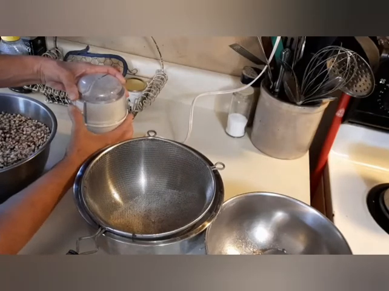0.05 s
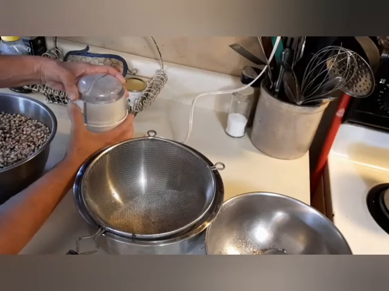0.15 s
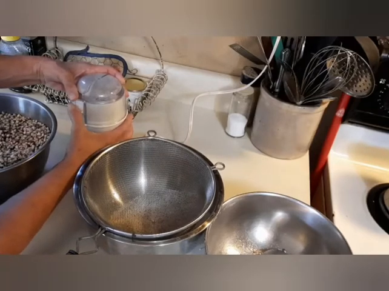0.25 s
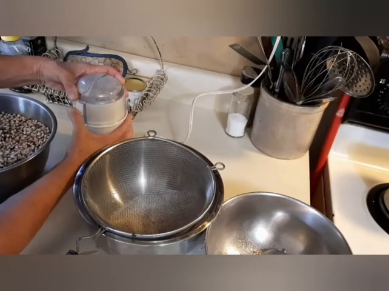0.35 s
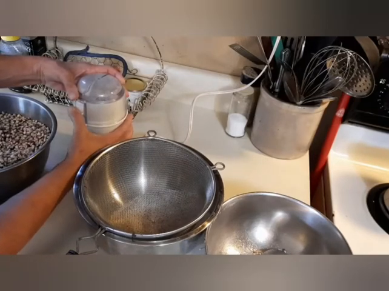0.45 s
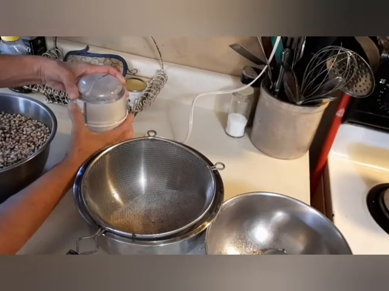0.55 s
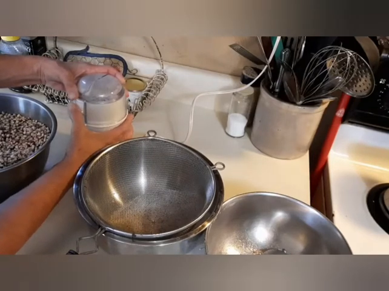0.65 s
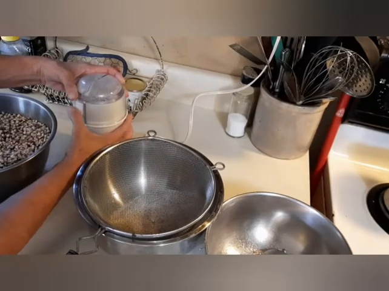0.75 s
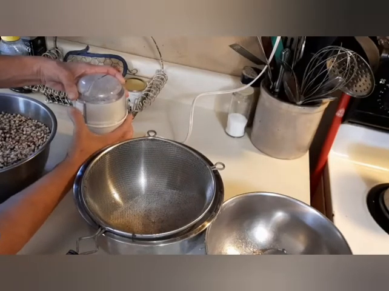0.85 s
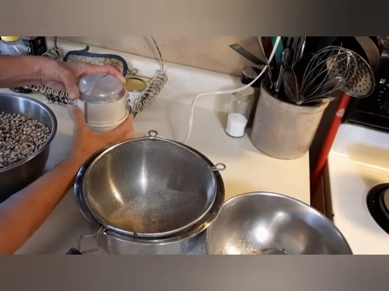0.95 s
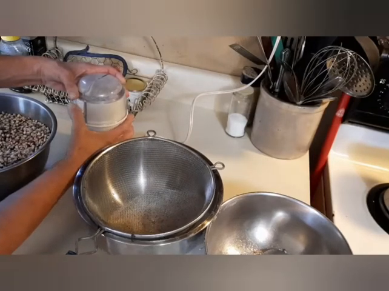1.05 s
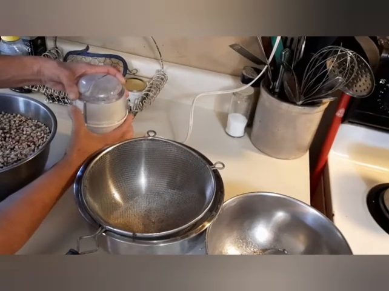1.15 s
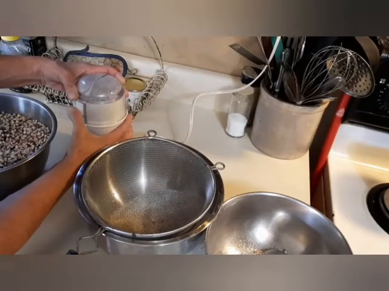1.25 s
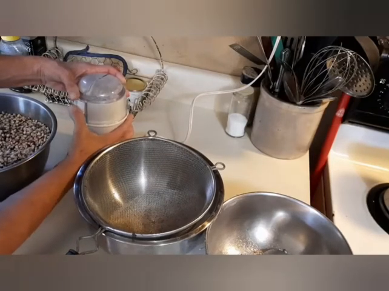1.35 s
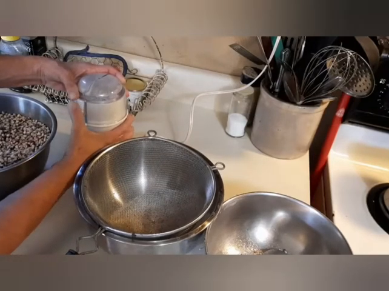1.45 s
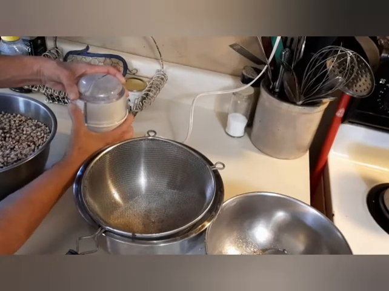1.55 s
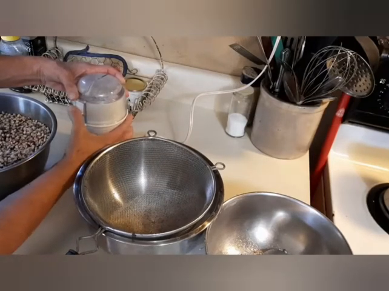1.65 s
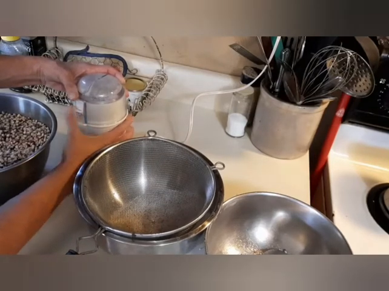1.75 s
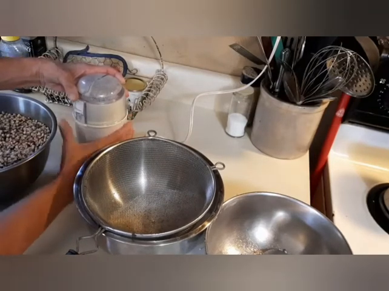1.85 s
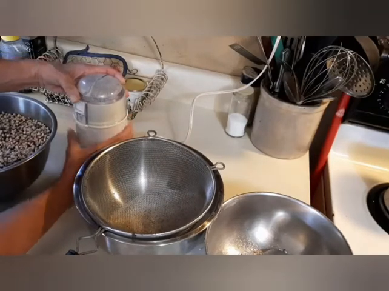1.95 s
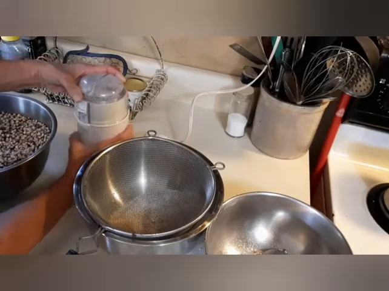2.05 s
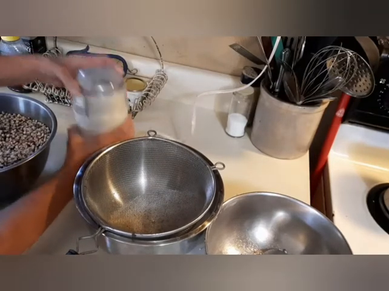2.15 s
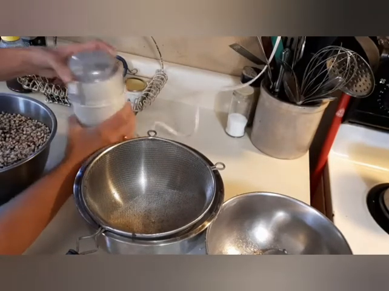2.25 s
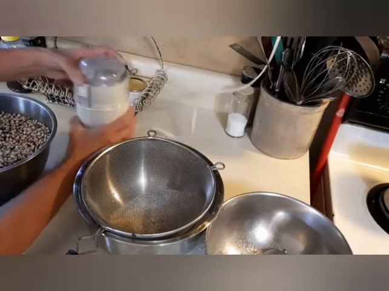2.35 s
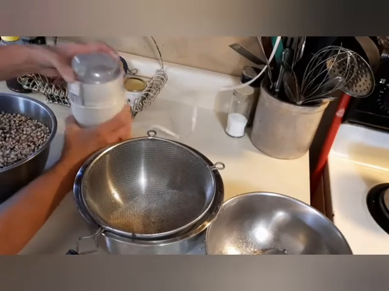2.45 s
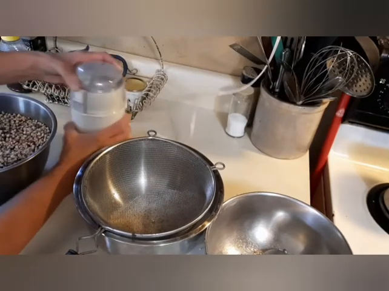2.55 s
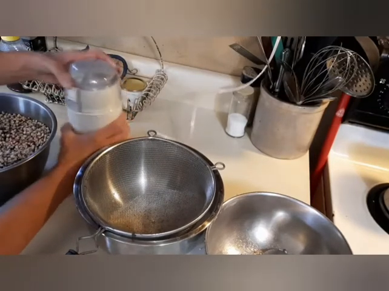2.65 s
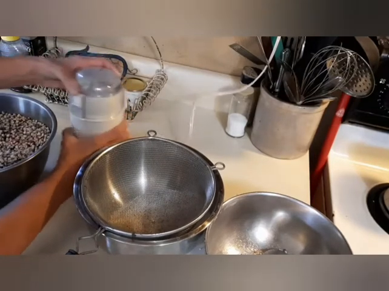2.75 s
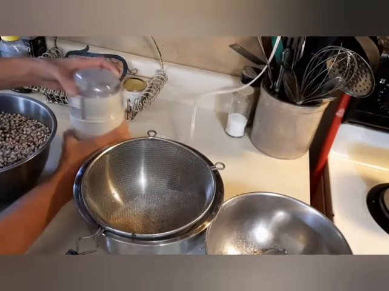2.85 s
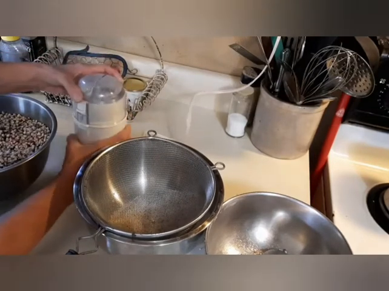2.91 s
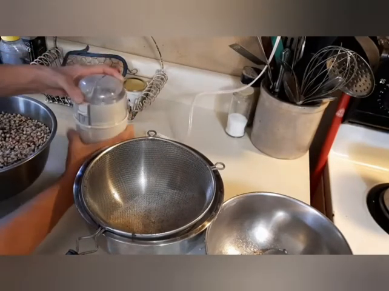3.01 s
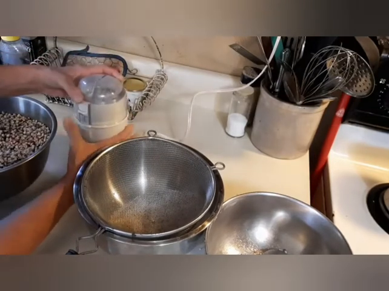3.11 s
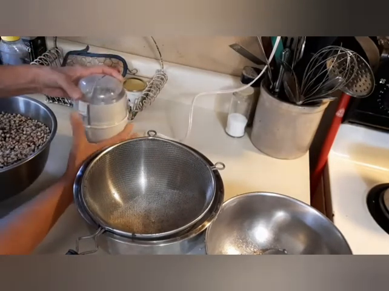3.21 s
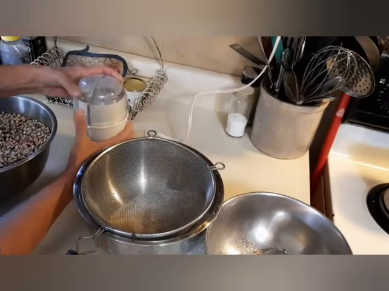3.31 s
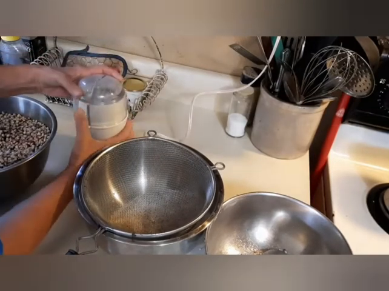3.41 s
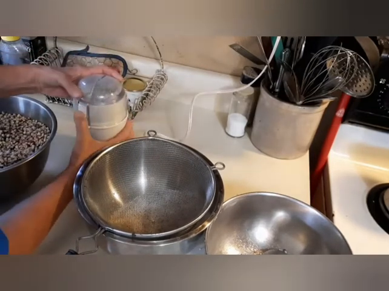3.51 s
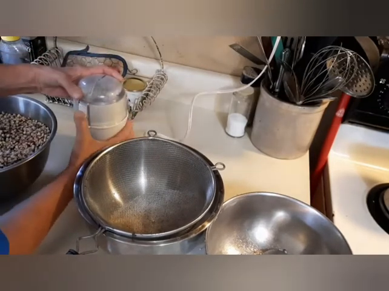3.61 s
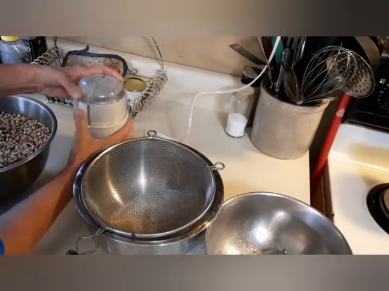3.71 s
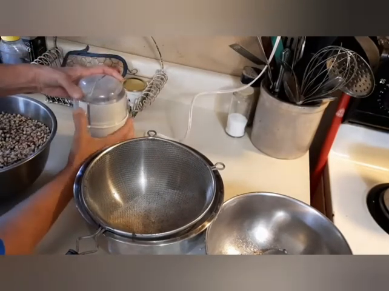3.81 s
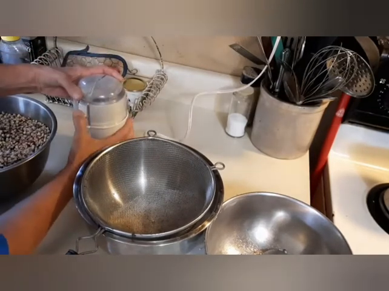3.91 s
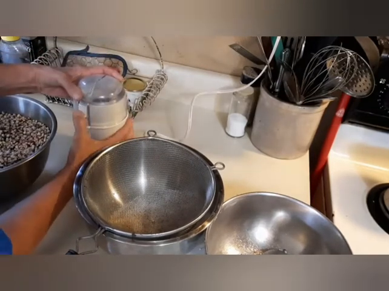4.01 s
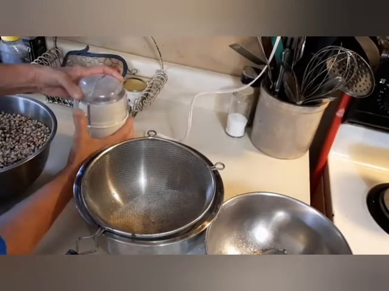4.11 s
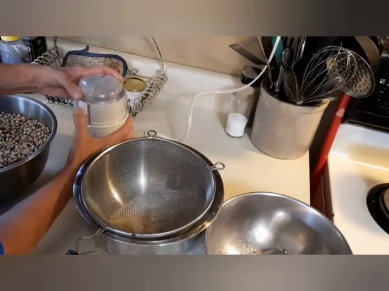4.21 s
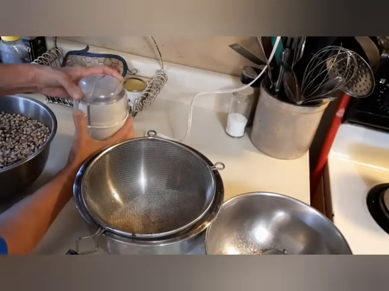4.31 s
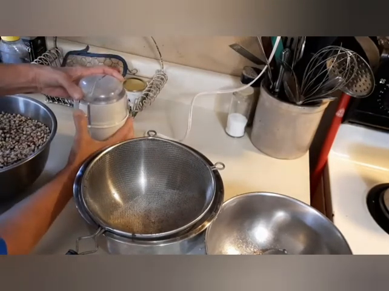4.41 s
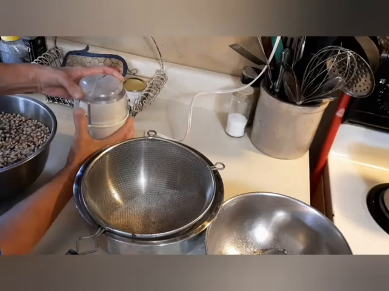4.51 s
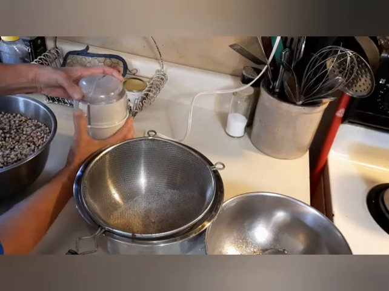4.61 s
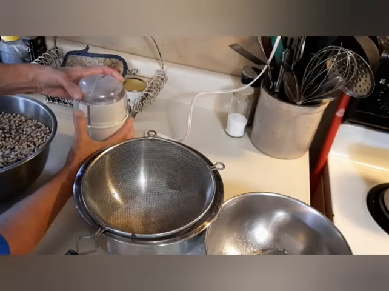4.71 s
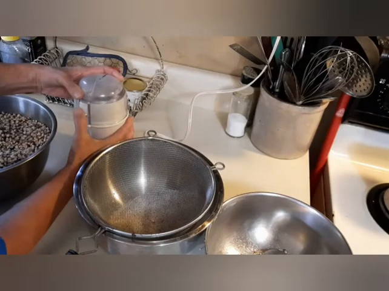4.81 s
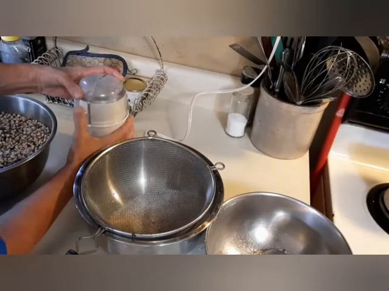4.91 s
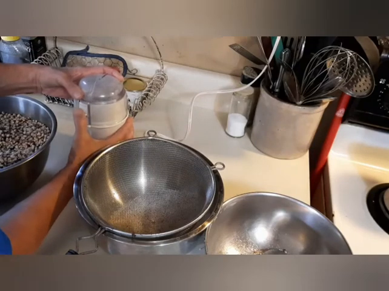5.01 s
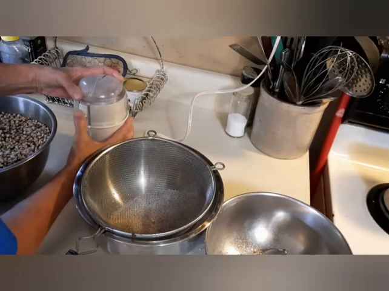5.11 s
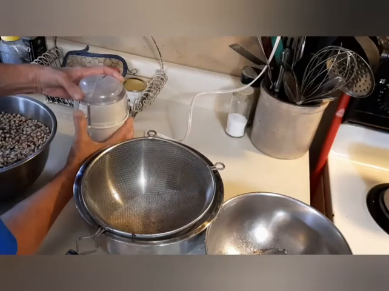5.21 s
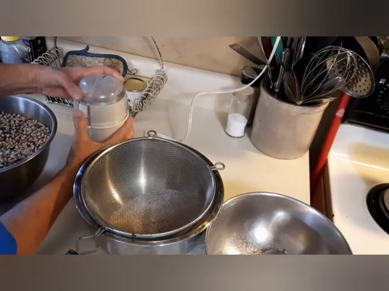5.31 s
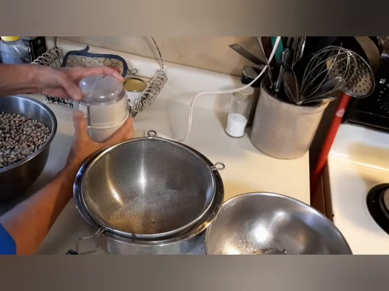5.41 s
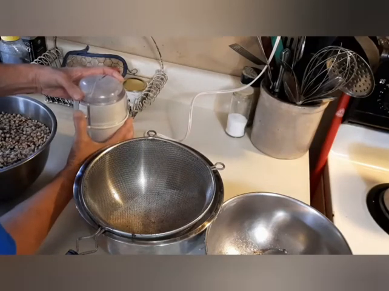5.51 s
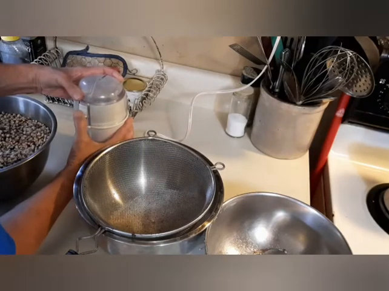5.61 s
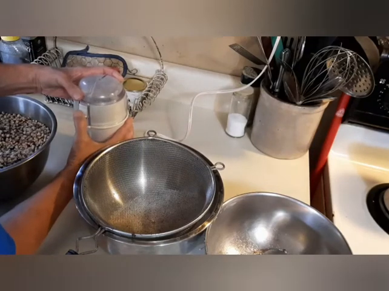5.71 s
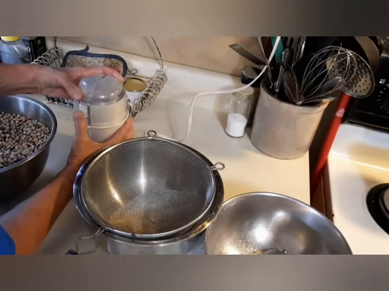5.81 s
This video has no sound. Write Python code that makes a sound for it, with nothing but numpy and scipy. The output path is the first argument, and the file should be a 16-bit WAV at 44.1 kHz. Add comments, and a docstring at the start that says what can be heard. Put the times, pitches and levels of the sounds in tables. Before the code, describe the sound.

Harsh, clattering grinding of dry kernels stops after two seconds, gives way to soft lid taps and shaking, then starts again abruptly.

```python
"""Blade grinder in a small kitchen

A hand-held grinder chops hard dry kernels in two runs, leaning left in most of the spectrum.
Clumps of kernels hit the cup as noise bursts and ring its modes; a faint sine shaft hum joins late.
Between the runs the grinder is shaken: lid and kernels tap, patter and swish in the quiet room.
Behind it lie decaying-noise echoes, coloured air, mains hum, motor rumble and low hand bumps."""
import sys
import numpy as np
from scipy import signal
from scipy.fft import rfft, irfft, next_fast_len
from scipy.io import wavfile

SR = 44100
rng = np.random.default_rng(int(sys.argv[2]) if len(sys.argv) > 2 else 0)


def waveform_to_disk(signal):
    """Save audio, clipped to [-1, 1], as 16-bit WAV at the path in sys.argv[1]."""
    frames = np.transpose(np.atleast_2d(signal))
    scaled = np.clip(frames, -1, 1) * 32767
    samples = np.round(scaled).astype(np.int16)
    wavfile.write(sys.argv[1], SR, samples)


N = 258426
T = np.arange(N) / SR
HZ = np.fft.rfftfreq(next_fast_len(N), 1 / SR)

# loud clumps cracked by the blade: t/s, relative peak level/dB, hiss level/dB over peak, struck spot f/Hz
CRACK_HITS = [(0.0134, -18, 6, 2530), (0.1582, -13.5, -4, 2540), (0.2314, -22, 8, 1720),
              (0.3304, -16.5, 2, 3300), (0.3457, -8, -2, 1780), (0.3737, -16, 6, 3330),
              (0.4343, -11.5, 2, 1760), (0.4814, -13, 2, 2680), (0.508, -13, 0, 1700),
              (0.5229, -9.5, 0, 2800), (0.5386, -10.5, 0, 4260), (0.6404, -29.5, -3, 2760),
              (0.6797, -15, -10, 1770), (0.6954, -21, 5, 1750), (0.7405, -20, -5, 2550),
              (0.8474, -17.5, 5, 2670), (0.8784, -15, 1, 2580), (0.9024, -16, 0, 4890),
              (0.9946, -9.5, 1.5, 2620), (1.0574, -16, 1, 2680), (1.0764, -20, 11, 3830),
              (1.1074, -21, 5, 2570), (1.1977, -15.5, 3, 4410), (1.2307, -16, 5, 1680),
              (1.3045, -14, 3, 1730), (1.3404, -15, 3, 2570), (1.3804, -19, 4, 4260),
              (1.4334, -27, 14, 1730), (1.506, -11.5, -2, 2570), (1.6174, -13.5, -9, 2650),
              (1.6495, -17.5, 6, 2620), (1.725, -12.5, -9, 3800), (1.7414, -13, -3, 3900),
              (1.7778, -26, 11, 4910), (1.8233, -9, -18, 3970), (1.8598, -22, -19, 3710),
              (1.893, -22, -17, 4150), (1.9074, -15, -16, 2500), (3.5187, -28, -11, 2000),
              (3.5639, -8, -15, 1970), (3.5874, -18, 3, 2680), (3.684, -21, 10, 2270),
              (3.7524, -14, -7, 2520), (3.8304, -17, 4, 2740), (3.8945, -9, -15, 1780),
              (3.9365, -9, -1, 4400), (3.973, -12, -20, 2610), (4.06, -16, 3, 1750),
              (4.0837, -13.5, -5, 2600), (4.126, -13, -5, 2930), (4.2634, -22, 8, 3830),
              (4.305, -8.5, -5, 2500), (4.494, -11.5, -13, 2730), (4.5211, -13.5, 1, 4200),
              (4.554, -10.5, -7, 2600), (4.586, -9, -1, 3960), (4.633, -12, -7, 4530),
              (4.7027, -10.5, -0.5, 2620), (4.7269, -9.5, -2, 2500), (4.8095, -11, -12, 2550),
              (4.8554, -14, -13, 4900), (4.895, -21, -4, 1730), (4.9147, -16, -6, 3870),
              (5.0135, -18, -12, 2780), (5.0407, -15, -12, 1670), (5.0566, -15.5, -11, 2530),
              (5.09, -15, -12, 2600), (5.172, -15.5, -14, 2600), (5.1906, -9.5, -10, 3200),
              (5.212, -17, -12, 4400), (5.2374, -17, -5, 2550), (5.2928, -12, -15, 2490),
              (5.3163, -26, -9, 2600), (5.3338, -12.5, 0.5, 4430), (5.4058, -19, 4, 2620),
              (5.4455, -19, 6, 2550), (5.4766, -13, -2, 1770), (5.5, -14, -9, 4420),
              (5.535, -13.5, -1, 3680), (5.6096, -18, -6, 2540), (5.7767, -14, -6, 1750),
              (5.8127, -10.5, -5, 4440), (5.8286, -7.5, 0.5, 2580)]
# taps of lid and loose kernels: t/s, relative peak level/dB, then bright, dull and lid ring level/dB over peak
LID_TAPS = [(2.2279, -55.5, -1, -11, 0), (2.2355, -51.5, -7, -9.5, -2.5), (2.3413, -46, 0.5, -13.5, 2.5),
            (2.4178, -45, -14, -29, -6), (2.443, -49, -7, -35, -10), (2.5339, -47.5, -17, -10, -6),
            (2.559, -59, -11, -14, -18), (2.582, -56, -13, -19.5, -12), (2.6998, -46.5, -19, -4.5, -14),
            (2.9164, -36, -9.5, -16, -39), (2.9366, -44.5, -4.5, -4, -23), (3.256, -64.5, 1, -1, -4.5),
            (3.409, -50, -6.5, 13.5, -13)]
# turning shaft: t/s, rotation f/Hz, rms level/dB
SHAFT_TURNS = [(4.35, 205, -75), (4.45, 210, -58.5), (4.65, 212, -72), (4.85, 218, -56), (5.1, 214, -80),
               (5.3, 217, -62), (5.6, 232, -57.5), (5.86, 243, -53)]
# spectrum of the kitchen air: f/Hz, relative level/dB per Hz
AIR_SPECTRUM = [(24, -46.5), (40, -9.5), (154, -18), (188, -7), (253, -17), (377, -8), (637, -24.5),
                (949, -21.5), (1130, -17), (15500, -41)]
# spectrum of struck cup and microphone: f/Hz, relative level/dB per Hz
CHOP_SPECTRUM = [(120, -43), (200, -21.5), (283, -20), (400, -9.5), (536, -18.5), (927, -11.5), (1180, -19),
                 (1720, -8.5), (2110, -8), (2580, -2.5), (3040, -3.5), (4370, -8.5), (9420, -12.5),
                 (11700, -4.5), (13100, 6), (15700, 3.5)]
# modes of cup and lid: f/Hz, width f/Hz, relative level/dB
CUP_MODES = [(416, 4.7, -16.5), (602, 14, -9.5), (689, 54, -6.5), (934, 87, -9.5), (1733, 43, -3.5),
             (1958, 57, -8.5), (2559, 19, -0.5), (2640, 180, -0.5), (2800, 140, -13.5), (3283, 120, -4),
             (3800, 45, -3), (4300, 130, -1.5), (4730, 70, -11.5), (5740, 570, -9)]
# modes of the tapped lid: f/Hz, relative level/dB, t60 t/s
LID_MODES = [(950, 4, .04), (1250, -12, .1), (1870, 0, .045), (2300, -8, .04), (2870, -7, .035),
             (3170, -4, .1), (3550, -9, .04), (4900, -16, .06)]
# stereo lean: f/Hz, left minus right level/dB
STEREO_LEAN = [(60, 0), (300, -1.5), (700, 3.5), (1700, 4), (2500, -1.5), (3900, 4), (5000, -2),
               (8000, -3.5), (10000, 2), (11500, 5), (13000, 4), (15500, -3.5)]
# left-right likeness: f/Hz, shared part of the power [0..1]
STEREO_LIKENESS = [(60, 0.34), (150, 0.15), (400, 1), (1200, 0.76), (2200, 0.053), (4000, 0.38),
                   (6000, 0.043), (15000, 0.13)]
# decay of the kitchen: f/Hz, t60 t/s
ROOM_DECAY = [(300, 0.39), (1500, 0.12), (5000, 0.3), (14000, 0.043)]
# moments when few kernels are in flight: t/s, dip level/dB
KERNEL_LULLS = [(.1, -3.5), (.27, -6), (0.592, -6.5), (0.788, -3.5), (.96, -4), (1.15, -1.5), (1.56, -6),
                (1.69, -4.5), (1.8, -4.5), (3.65, -1), (3.86, -1.5), (4.04, -4), (4.22, -2.5), (4.43, -2.5),
                (4.68, -2), (4.78, -1.5), (4.96, -4.5), (5.13, -4.5), (5.27, -6), (5.7, -5.5)]
# low bumps of the hands on the housing: t/s, peak ring level/dB, length t/s, ring f/Hz
HAND_BUMPS = [(2.323, -54, 0.035, 108), (2.977, -71, .05, 96), (3.426, -57, 0.023, 111)]
# grounds sliding in the shaken cup: t/s, relative swish level/dB, relative patter level/dB, length t/s
CUP_SHAKES = [(2.34, -60, -57.5, 0.052), (2.438, -85, -65, 0.031), (2.57, -70, -68, 0.054),
              (2.78, -72, -75, 0.032), (2.944, -65, -69, 0.027), (2.989, -69, -61, 0.054),
              (3.257, -76, -72, 0.0097), (3.415, -76, -72, .015)]

SWITCH_OFF_S, SWITCH_ON_S = 1.9, 3.435
COAST_DB_PER_S, COAST_DB_PER_S2 = -74, -260  # the blade coasts down ever faster
START_DB, SPIN_UP_S, SPIN_UP_BEND = -31, 0.091, 1.2  # first turn, time to full speed; above 1 = quick at first
OVERSHOOT_DB, OVERSHOOT_S = 10, 0.065  # the level briefly overshoots after the restart, then settles
LULL_S = 0.023
# drive level of each range, and how strongly it follows the blade's effort
RATTLE_DB, HISS_DB, THUD_DB = -29.5, -27.5, -42.5
RATTLE_FOLLOWS, HISS_FOLLOWS, THUD_FOLLOWS = 0.94, 1.3, 0.63
HISS_OVERSHOOT, THUD_OVERSHOOT = 0.28, 1.49  # share of the overshoot
HISS_LULL = 0.95  # fine dust thins less than the kernels in a lull
CREST_DB = 7.5  # peak of a crack over its rms
SMALL_PER_S, SMALL_DB, SMALL_SPREAD_DB, SMALL_HISS_DB = 9, -15.5, 1, -8.5  # lesser clumps at random
SLIDE_RISE = 0.87  # rise time as a share of the fall
RUMBLE_DB, RUMBLE_WANDER_DB, RUMBLE_PER_S = -60, 16.5, 14
BUMP_ROUGH_DB = -3  # noisy part of a bump over its ring
AIR_DB = -75.5
HUM_HZ, HUM_DB = 58, -5  # mains hum, its peak against the air level
RIGHT_LATE = 8  # samples
EDGE_HZ = 15780


def chopping():
    """Both runs of the blade; each range follows the effort by its own amount."""
    db, lulls, overshoot = effort()
    rattle = gain_of(RATTLE_DB + RATTLE_FOLLOWS * db + lulls + overshoot)
    hiss = gain_of(HISS_DB + HISS_FOLLOWS * db + HISS_LULL * lulls + HISS_OVERSHOOT * overshoot)
    thud = gain_of(THUD_DB + THUD_FOLLOWS * db + lulls + THUD_OVERSHOOT * overshoot)
    return chop(rattle, hiss, thud)


def chop(rattle, hiss, thud):
    """Pelting kernels and cracked clumps drive the ranges of the cup and its modes."""
    colour = gain_of(read(CHOP_SPECTRUM, HZ))
    s, peak_db, hiss_db, spot_hz = clumps()
    crack = bursts(s, peak_db - CREST_DB, 0.0023, 0.047)
    latest = np.maximum(np.searchsorted(s, T) - 1, 0)
    out = struck_spot(gain_of(-5) * crack, spot_hz[latest], 320)

    # small and large chips land at their own moments, so each range flickers alone
    ranges = (1200, 1710, -8.5), (2140, 6400, -7), (3240, 7070, -3.5), (5600, 5800, -7.5)
    for lo_hz, hi_hz, db in ranges:
        chips = rattle * pelting(400, 2.2, .025)
        envelope = gain_of(db) * np.hypot(chips, gain_of(-0.5) * crack)
        out += stereo_noise(envelope, colour * band(lo_hz, hi_hz))

    dust = gain_of(2.5) * hiss * pelting(700, 2.8, .02)
    spray = bursts(s, peak_db + hiss_db - 3.0, 0.0036, .05)
    out += stereo_noise(np.hypot(dust, gain_of(5.5) * spray), colour * band(5300, 43000))

    body = np.hypot(rattle, gain_of(5.5) * crack)
    thud = thud * np.hypot(.8, gain_of(22.5) * crack)
    out += stereo_noise(thud * gain_of(4.0) * pelting(300, 2.2, 0.067), colour * band(230, 1950))

    # each mode is rung mostly by the kernels that land near its belly
    for hz, width, db in CUP_MODES:
        mode = band(hz / 2, hz * 2) / np.hypot(1, 2 * (HZ - hz) / width)
        drive = thud * gain_of(10.0) if hz < 1200 else body
        out += stereo_noise(drive * pelting(140, 4.1, 0.038) * gain_of(db - 12), mode)
    return out


def effort():
    """Blade effort in dB under full speed, the lulls, and the level overshoot after the restart."""
    t = T[::32]
    coast = np.clip(t - SWITCH_OFF_S, 0, None)
    spin = (t - SWITCH_ON_S) / SPIN_UP_S
    first = COAST_DB_PER_S * coast + COAST_DB_PER_S2 * coast ** 2
    second = np.where(spin > 0, START_DB * np.clip(1 - spin, 0, 1) ** SPIN_UP_BEND, -200)
    lulls = sum(db * np.exp(-((t - s) / LULL_S) ** 2) for s, db in KERNEL_LULLS)
    settling = np.exp(-np.clip(spin - 1, 0, None) ** 2 * (SPIN_UP_S / OVERSHOOT_S) ** 2)
    overshoot = OVERSHOOT_DB * np.clip(spin, 0, 1) * settling
    return [np.interp(T, t, db) for db in (np.maximum(first, second), lulls, overshoot)]


def clumps():
    """The loud cracks and lesser ones at random, in time order."""
    when, size, spot = rng.random((round(SMALL_PER_S * N / SR), 3)).T
    at = (when * (N - 1)).astype(int)
    small_db = SMALL_DB + SMALL_SPREAD_DB * (size - .5) + sum(effort()[:2])[at]
    spots = np.array(CUP_MODES)[4:12, 0]  # lesser clumps strike the middle modes
    spot_hz = spots[(spot * len(spots)).astype(int)]
    small = np.c_[T[at], small_db, SMALL_HISS_DB + 0 * size, spot_hz]
    rows = np.r_[CRACK_HITS, small]
    return rows[np.argsort(rows[:, 0])].T


def struck_spot(envelope, hz, width):
    """Noise through a resonance that jumps with the curve hz; the right microphone hears it later."""
    turn = np.exp(2j * np.pi * np.cumsum(hz) / SR)
    r = np.exp(-np.pi * width / SR)
    noise = envelope * (rng.standard_normal(N) + 2.26 * rng.standard_normal((2, N)))
    # shift the spot down to zero, smooth, and shift back up
    smooth = signal.lfilter([1 - r], [1, -r], noise / turn)
    left, right = np.sqrt(2 / (1 - r)) * (turn * smooth).real
    return np.array([left, np.roll(right, RIGHT_LATE)])


def shaft():
    """Unbalanced blade hums once a turn: a gliding sine that fades in during the second run."""
    s, hz, db = np.transpose(SHAFT_TURNS)
    turns = np.cumsum(np.interp(T, s, hz)) / SR
    level = np.sqrt(2) * gain_of(np.interp(T, s, db))
    fade_in = np.clip((T - s[0]) / 0.079, 0, 1)
    return level * fade_in * np.sin(2 * np.pi * turns)


def taps():
    """Each tap is a short crack in three ranges that also rings the lid as decaying sines."""
    s, peak_db, bright_db, dull_db, ring_db = np.transpose(LID_TAPS)
    middle = bursts(s, peak_db - 8.5, 0.00062, 0.075)
    bright = bursts(s, peak_db + bright_db - 5.5, 0.00039, 0.066)
    dull = bursts(s, peak_db + dull_db - 5.5, 0.0022, 0.066)
    out = stereo_noise(middle, band(1200, 2500))
    out += stereo_noise(bright, band(6200, 6600) * 4000 / (HZ + 4000))
    out += stereo_noise(dull, band(260, 1060) / np.hypot(1, (HZ - 390) / 80))
    t = T[:12000]
    blows = bursts(s, peak_db + ring_db - 8.5, 0.00034, 0.003)
    # every blow lands elsewhere, so each mode gets its own share of it
    for hz, db, t60 in LID_MODES:
        ring = gain_of(db - 60 * t / t60) * np.sin(2 * np.pi * hz * t)
        out += signal.oaconvolve(blows * rng.standard_normal(N), ring)[:N]
    return out


def shaking():
    """Loose kernels patter in the mid range and sliding grounds swish in the treble."""
    patter = slides(column=2) * gain_of(-2.0) * pelting(150, 1.8, 0.02)
    swish = slides(column=1) * gain_of(-7.0) * pelting(900, 2.1, 0.012)
    out = stereo_noise(patter, band(880, 3000) * (0.68 + 1 / np.hypot(1, (HZ - 3100) / 120)))
    return out + stereo_noise(swish, band(12000, 15500) ** 2)


def slides(column):
    """Gain of the shakes: each swells and dies away more slowly."""
    t = T[::32]
    total = np.zeros(len(t))
    for row in CUP_SHAKES:
        s, length = row[0], row[3]
        bend = 2 * (t - s) / length / np.where(t < s, SLIDE_RISE, 1)
        total += gain_of(row[column]) / np.cosh(np.clip(bend, -50, 50))
    return np.interp(T, t, total)


def kitchen(x):
    """Dense random reflections; three tails fade in and out in turn, so the echo keeps changing."""
    hz, t, z = signal.stft(rng.standard_normal((3, 2, SR // 2)), SR, nperseg=256)
    decay = gain_of(-60 * t / read(ROOM_DECAY, hz)[:, None])
    tails = signal.istft(z * decay, SR, nperseg=256)[1]
    tails *= np.clip(T[:tails.shape[-1]] / 0.011, 0, 1)
    tails = tails / np.linalg.norm(tails[0, 0]) / np.sqrt(3 / 2)
    out = np.zeros((2, N))
    for k, tail in enumerate(tails):
        fade = np.cos(2 * np.pi * (2.0 * T + k / 3))
        out += signal.fftconvolve(x * fade, tail, axes=1)[:, :N]
    return out


def handling():
    """Low motor rumble at a randomly wandering level; bumps of the hands ring low."""
    knots = rng.standard_normal(400)
    wander = np.interp(T * RUMBLE_PER_S, np.arange(len(knots)), knots)
    rumble_db = RUMBLE_DB + RUMBLE_WANDER_DB * np.minimum(wander, .3) + sum(effort())
    rumble = gain_of(rumble_db) * pelting(110, 3.2, 0.13)
    pushes, rings = np.zeros(N), np.zeros(N)
    for s, db, length, hz in HAND_BUMPS:
        push = gain_of(db) * np.exp(-((T - s) / length) ** 2)
        pushes += push
        rings += push * np.sin(2 * np.pi * hz * (T - s))
    return rings + stereo_noise(rumble + gain_of(BUMP_ROUGH_DB) * pushes, band(46, 150))


def kitchen_air():
    """Steady coloured noise of the room with a sine of mains hum."""
    air = stereo_noise(gain_of(AIR_DB), gain_of(read(AIR_SPECTRUM, HZ)) * band(70, 20000))
    return air + gain_of(AIR_DB + HUM_DB) * np.sin(2 * np.pi * HUM_HZ * T)


def pelting(per_s, spread_db, t60):
    """Envelope of random strikes of very unequal size, each dying quickly; rms 1."""
    size = gain_of(spread_db * np.minimum(rng.exponential(1, N), 4))
    strikes = size * (rng.random(N) < per_s / SR)
    # powers add, so the decay is squared too
    power = signal.oaconvolve(strikes ** 2, gain_of(-120 * T[:4000] / t60))[:N]
    return evened(np.sqrt(abs(power)))


def bursts(times, peak_db, rise, t60):
    """Envelope of single blows with a short rise, summed as power."""
    spikes, t = np.zeros(N), T[:16000]
    spikes[(np.array(times) * SR).astype(int)] = gain_of(2 * np.array(peak_db))
    shape = (1 - np.exp(-t / rise)) * gain_of(-60 * t / t60)
    return np.sqrt(abs(signal.oaconvolve(spikes, shape ** 2)[:N]))


def stereo_noise(envelope, colour):
    """Noise under an envelope, partly shared by both microphones, then coloured; about rms 1 before the lean."""
    shared, left, right = rfft(envelope * rng.standard_normal((3, N)), next_fast_len(N))
    same = np.clip(read(STEREO_LIKENESS, HZ), 0, 1)
    late = np.exp(-2j * np.pi * HZ * RIGHT_LATE / SR)
    common = np.sqrt(same) * shared * np.array([late ** 0, late])
    pair = common + np.sqrt(1 - same) * np.array([left, right])
    lean = gain_of(np.outer([.5, -.5], read(STEREO_LEAN, HZ)))
    level_colour = colour / np.sqrt(np.mean(colour ** 2))
    return np.sqrt(2) * irfft(pair * lean * level_colour, next_fast_len(N))[:, :N]


def band(lo_hz, hi_hz):
    """Soft-edged pass band."""
    return 1 / np.sqrt((1 + (lo_hz / (HZ + 1)) ** 6) * (1 + (HZ / hi_hz) ** 6))


def read(points, hz):
    """Reads a table on a log frequency axis."""
    f, value = np.transpose(points)
    return np.interp(np.log(hz + 1), np.log(f + 1), value)


def evened(x):
    """Scales to rms 1."""
    return x / np.sqrt(np.mean(x ** 2) + 1e-20)


def gain_of(db):
    """Decibels to gain."""
    return 10 ** (np.asarray(db) / 20)


def scene():
    """The grinder, its taps and shakes, their echo in the kitchen and the background."""
    grind, knocks = chopping(), taps() + shaking()
    to_room = gain_of(-13) * grind.mean(0) + gain_of(-3.5) * knocks.mean(0)
    return grind + shaft() + knocks + kitchen(to_room[None]) + handling() + kitchen_air()


def record(dry):
    """Soft overload of the input, then the band limit of the recorder."""
    rounded = .9 * np.tanh(dry / .9)
    low_pass = signal.firwin(1023, EDGE_HZ, window=("kaiser", 9), fs=SR)
    return signal.oaconvolve(rounded, low_pass[None], "same")


dry = scene()
out = record(dry)
waveform_to_disk(out)
```